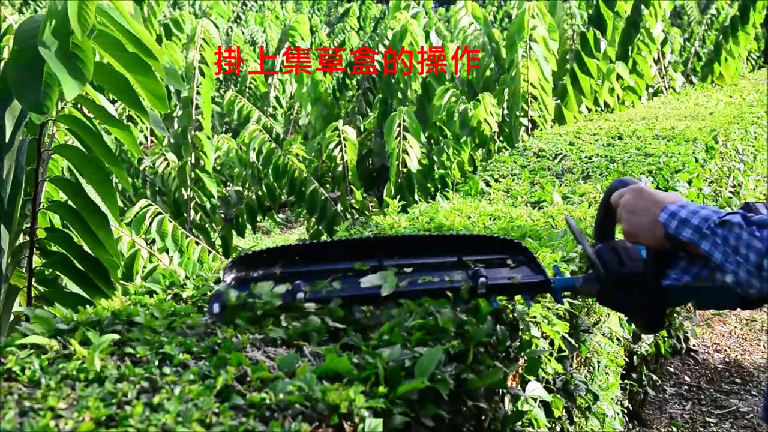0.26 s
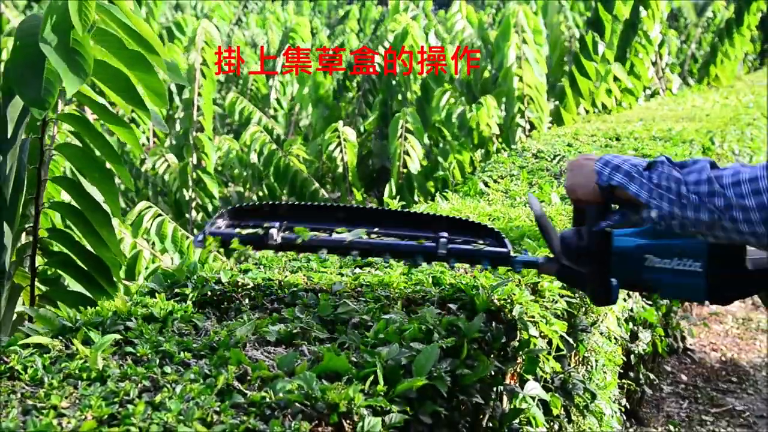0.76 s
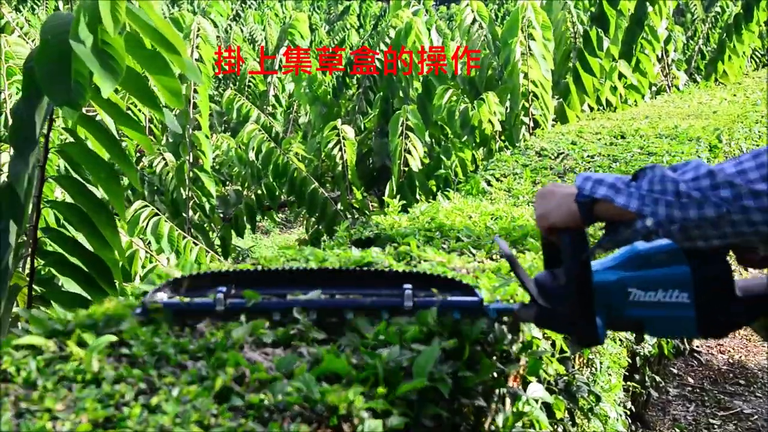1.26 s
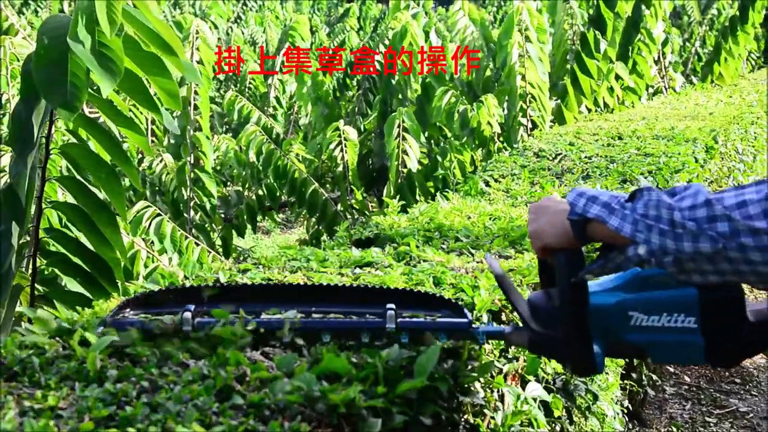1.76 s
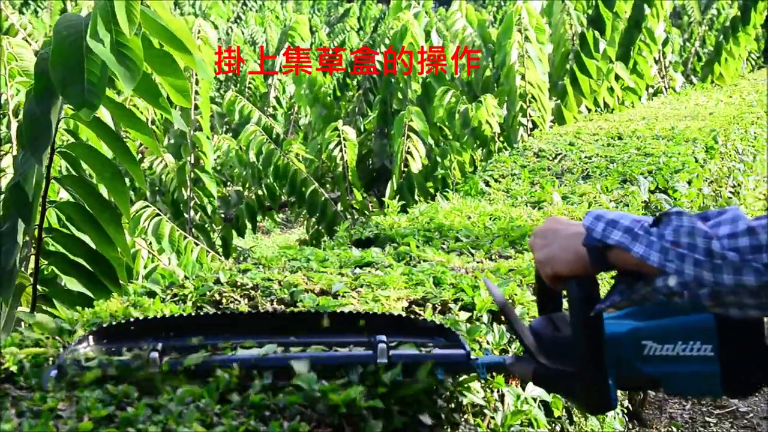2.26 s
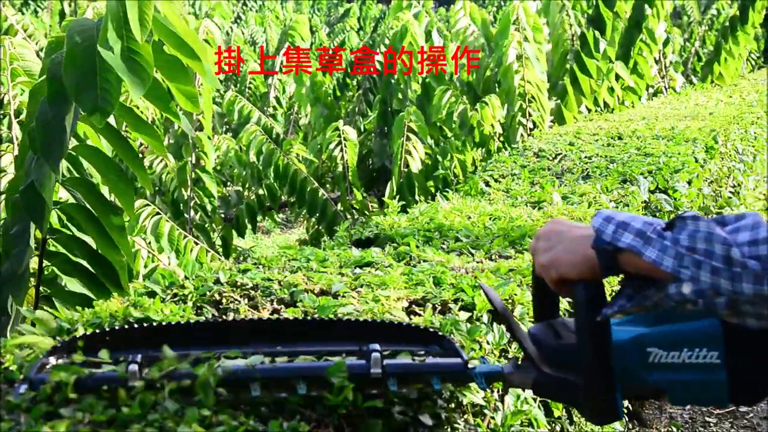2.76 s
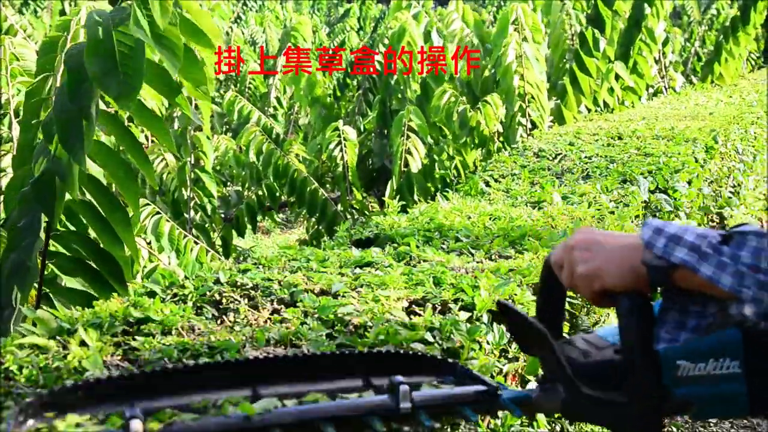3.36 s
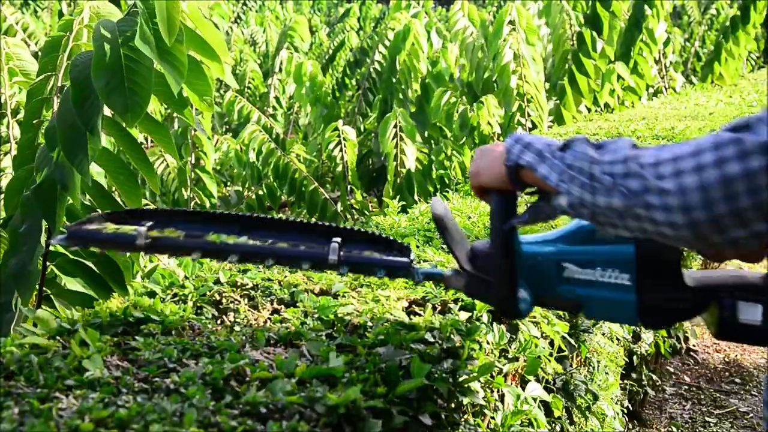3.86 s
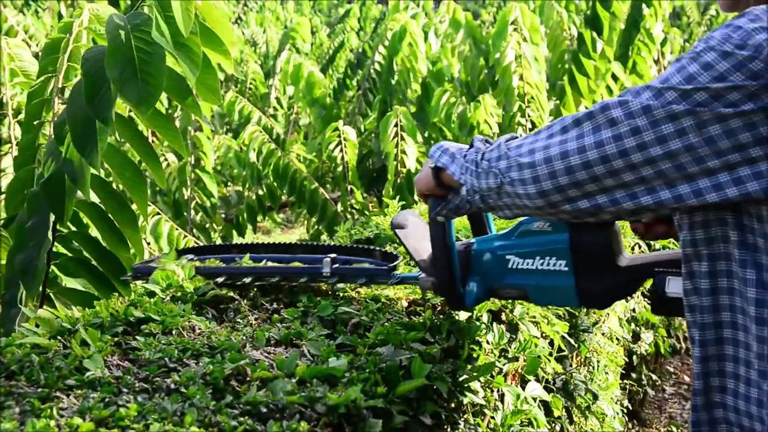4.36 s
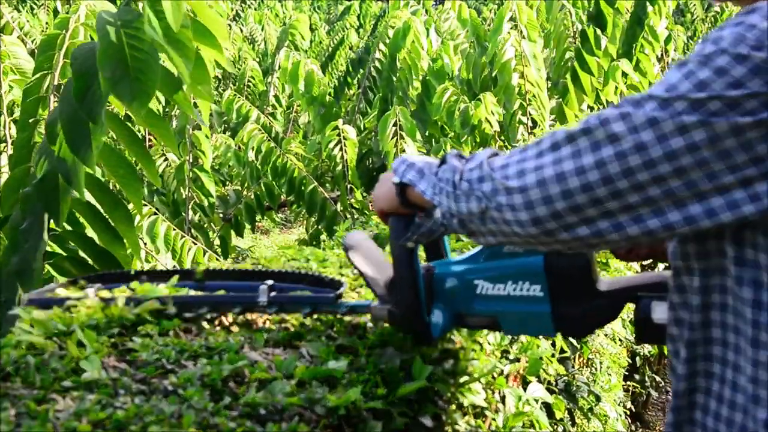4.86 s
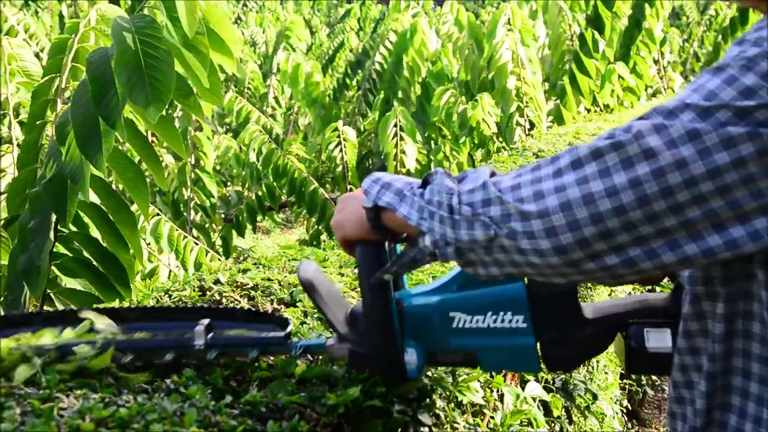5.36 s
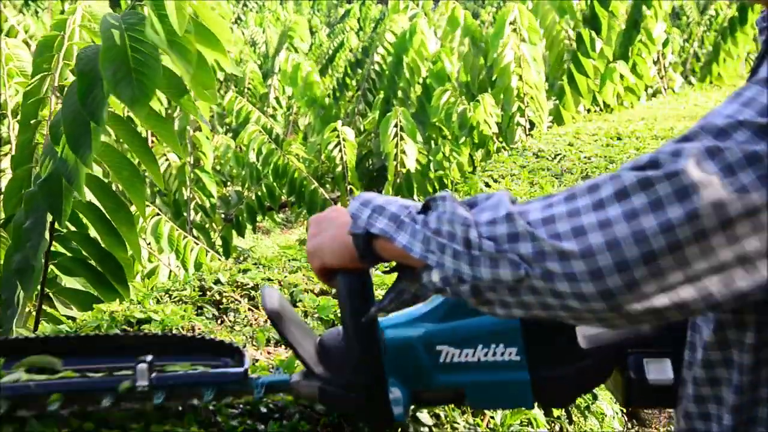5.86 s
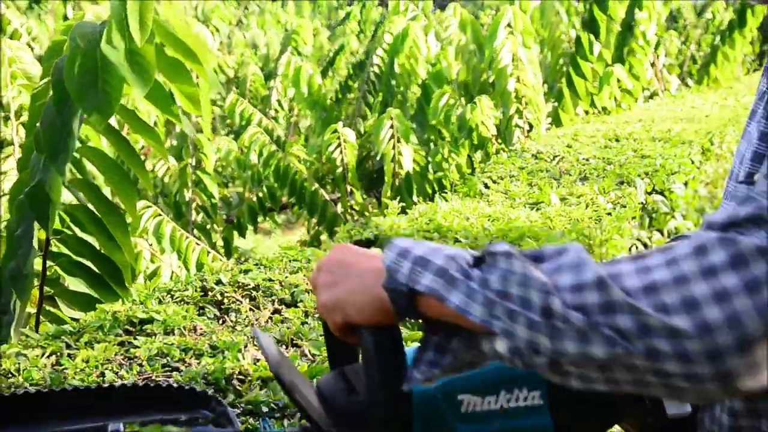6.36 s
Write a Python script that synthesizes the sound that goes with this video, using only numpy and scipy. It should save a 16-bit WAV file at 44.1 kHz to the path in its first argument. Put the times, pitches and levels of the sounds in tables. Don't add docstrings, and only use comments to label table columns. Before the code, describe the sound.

A running hedge trimmer is cut off in the first instant, leaving soft field hiss, a faint distant one-cylinder engine, leaf rustle and tiny bird chirps around 0.1-0.4 s. Plastic guard clicks with a springy rattle come at 0.5 s, a thin grip squeak near 0.65 s, louder lever clicks at 0.67 s and the trigger at 0.75 s. The motor surges up into a harsh, bright metallic clatter, about sixty strokes a second, with gear whine and scattered twig snaps; the whine and treble strengthen around 2.3-2.7 s. It coasts slightly and brakes abruptly at 3.28 s. Leaves rustle, a clipping snaps dully at 3.38 s and the far engine thumps. At 3.78 s the trimmer restarts, cutting until the end at 6.6 s, with a faint wind flutter near 4.7 s, hollow woody knocks around 5.6 and 6.05 s, and clustered loud snaps from 6.2 s.

```python
import sys
import numpy as np
from scipy import signal
from scipy.fft import rfft, irfft
from scipy.io import wavfile
from scipy.ndimage import uniform_filter1d

SR = 44100
rng = np.random.default_rng(int(sys.argv[2]) if len(sys.argv) > 2 else 0)


def persist_wave(psi):
    counts = np.round(np.clip(psi, -1, 1) * 32767).astype(np.int16)
    wavfile.write(sys.argv[1], SR, np.atleast_2d(counts).T)


def linear_from_db(decibels):
    return 10 ** (np.asarray(decibels, float) / 20)


N = 291501
TIME = np.arange(N) / SR

# pulled in seconds, blades braked in seconds, start-up surge in dB.
TRIGGER = [
    (-1, 0.002, 0),
    (0.7535, 3.282, 4),
    (3.78, 9, 4.5),
]
# time in seconds, level in dB,
# how far the blade points at the camera [0-1].
SWING = [(0, -17, 0.3), (1.1, -16.5, 0.16), (2.0, -17, 0.43), (2.7, -19, 0.76), (3.1, -17, .6),
         (4.0, -17, 0.24), (5.0, -17.5, 0.67), (5.9, -17.5, 0.97), (6.62, -18.5, 0.87)]


def level(x, db=0):
    return x * linear_from_db(db) / np.sqrt(np.mean(x ** 2))


def read(tables, column, off=-120.):
    curves = [np.array(table) for table in tables]
    return np.max([np.interp(TIME, c[:, 0], c[:, column], off, off) for c in curves], axis=0)


def colour(x, points):
    hz, db = np.transpose(points)
    bins = np.arange(1025) * SR / 2048
    cepstrum = irfft(np.interp(np.log(bins + 1), np.log(hz), db) * np.log(10) / 20)
    cepstrum[1:1024] *= 2
    cepstrum[1025:] = 0
    return signal.fftconvolve(x, irfft(np.exp(rfft(cepstrum))))[:N]


def ring(x, modes):
    return sum(linear_from_db(db) * signal.lfilter(*signal.iirpeak(hz, hz / width, SR), x) for hz, width, db in modes)


def butter(x, order, hz, kind="low"):
    return signal.sosfilt(signal.butter(order, hz, kind, fs=SR, output="sos"), x)


def walk(rate):
    hold = int(SR / rate)
    steps = np.repeat(rng.standard_normal(N // hold + 1), hold)
    return 0.83 * uniform_filter1d(steps, hold)[:N]


def grains(rate, spread_db, smear_s):
    hits = (rng.random(N) < rate / SR) * linear_from_db(2 * spread_db * rng.exponential(size=N).clip(0, 3))
    energy = signal.lfilter([1], [1, -np.exp(-2 / (smear_s * SR))], hits)
    return level(rng.standard_normal(N) * np.sqrt(energy + 1e-9))


def swells(rows):
    curves = []
    for peak_s, db, rise_s, fall_s in [row[:4] for row in rows]:
        rise, fall = (peak_s - TIME) / max(rise_s, .002), (TIME - peak_s) / max(fall_s, .002)
        curves.append(linear_from_db(db - 20 * np.maximum(rise, fall)))
    return np.array(curves)


def place(rows, shape):
    out = np.zeros(N + SR)
    for row in rows:
        y = shape(row)
        out[int(row[0] * SR):][:len(y)] += y
    return out[:N]


def stroke_rate():
    # time in seconds, strokes per second.
    first_cut = [(1.0, 55.35), (1.2, 57.35), (1.5, 59.08), (2.0, 58.94), (2.6, 59.25), (3.25, 58.45)]
    second_cut = [(4.0, 52.5), (4.05, 55.5), (4.1, 57), (4.3, 58.5), (4.6, 58.8), (5.0, 59.35), (5.5, 59.1),
                  (6.0, 59.25), (6.61, 58.9)]
    start_rate, catch_rate, coast_rate = 21, 41, 50
    catch_s = .11
    (_, (on1, off, _), (on2, _, _)) = TRIGGER
    points = []
    for on in (on1, on2):
        points += [(on, start_rate), (on + catch_s, catch_rate)]
    points += [(off + .01, coast_rate), (off + .05, start_rate)]
    return np.interp(TIME, *np.transpose(sorted(points + first_cut + second_cut)))


def strokes():
    # time in seconds, strokes done of the current pair [0-2].
    stroke_at = [
        (1.0, .45),
        (4.0, 1.64),
    ]
    done = np.cumsum(stroke_rate()) / SR
    (s1, p1), (s2, p2) = stroke_at
    return done + np.where(TIME < 3.5, p1 - done[int(s1 * SR)], p2 - done[int(s2 * SR)])


def stroke_number(done):
    return (done - done.min() // 2 * 2).astype(int)


def tool_gain():
    spin_up_s, surge_at_s, surge_wide_s = 0.087, .22, 0.11
    coast_s, coast_db_per_s, brake_db_per_s = 0.13, 34, 602
    gain = 0
    for on, off, surge_db in TRIGGER:
        since = np.maximum(TIME - on, 0)
        db = surge_db * np.exp(-((since - surge_at_s) / surge_wide_s) ** 2)
        db -= coast_db_per_s * np.clip(TIME - off + coast_s, 0, coast_s)
        db -= brake_db_per_s * np.maximum(TIME - off, 0)
        gain = gain + linear_from_db(db) * (1 - np.exp(-since / spin_up_s))
    return gain * linear_from_db(read([SWING], 1))


def clacks(done, scatter_db, slide):
    repeat_share = .18
    index, phase = stroke_number(done), done % 1
    rebound = 0.21 * np.exp(-((phase - .55) / 0.22) ** 2)
    shape = (1 - np.exp(-phase / 0.049)) * (np.exp(-phase / 0.26) + rebound)
    force = linear_from_db(scatter_db * rng.standard_normal(N // 400)[index] + 1.5 * (index % 2))
    worn = rng.standard_normal(1500)[(done % 2 * 749).astype(int)]
    noise = np.sqrt(1 - repeat_share) * rng.standard_normal(N) + np.sqrt(repeat_share) * worn
    return level(noise * (slide + force * shape))


def mesh(done, teeth, wobble):
    tones = 0
    for multiple, db in teeth:
        angle = 2 * np.pi * int(round(multiple)) * done + wobble * walk(120)
        tones = tones + linear_from_db(db + 1.7 * walk(25)) * np.sin(angle)
    return tones


def blades(done):
    # frequency in Hz, gain in dB per Hz.
    blade_colour = [(590, -31.5), (1000, -15.5), (1460, -5), (2110, -4.5), (2420, -2.5), (3330, -5),
                    (4050, 0), (5210, -4), (6480, -8.5), (8250, -12.5), (11000, -24), (15500, -32)]
    # frequency in Hz, width in Hz, level in dB.
    blade_rings = [(1375, 127, -1.5), (2470, 190, -2.5), (3440, 690, -0.5), (4710, 440, -3),
                   (6350, 460, -0.5)]
    # frequency in Hz, width in Hz, level in dB.
    steel = [(1620, 60, -6), (2950, 70, -4), (3560, 60, -2), (3950, 70, -2), (4330, 60, 0), (4620, 60, 0),
             (4870, 60, -1), (5130, 60, -2), (6450, 90, -5)]
    drive = clacks(done, 2.5, .5) + linear_from_db(-6) * grains(500, 3.5, .0012) * linear_from_db(2 * walk(14))
    rings = sum(ring(clacks(done, 3.5, .3), [mode]) * linear_from_db(3 + 1.5 * walk(3)) for mode in blade_rings)
    blade = level(colour(drive * linear_from_db(1.0 * walk(20)) + rings, blade_colour))
    bars = sum(ring(drive, [mode]) * linear_from_db(3.5 * walk(6)) for mode in steel)
    return level(blade + level(bars, -10))


def motor_housing(done):
    # frequency in Hz, width in Hz, level in dB.
    shell = [(433, 145, -0.5), (566, 82, -0.5), (805, 940, 7.5)]
    # multiple of the stroke rate, level in dB.
    crank = [(5, -10.5), (6, -8.5), (7, -3.5), (9, -2), (10, -7), (11, -4)]
    shaken = level(ring(ring(clacks(done, 2.7, 0.57), shell), [(614, 920, 0)]))
    return shaken + linear_from_db(-12) * mesh(done, crank, .3)


def cut_stems(done):
    # peak in seconds, level in dB against the tool,
    # seconds to rise 20 dB, seconds to fall 20 dB.
    patches = [
        (1.15, -12, 1.5, 2.5),
        (2.45, -10, 1.5, 3),
        (5.3, -14, 2, 1),
        (5.6, -6.5, 0.4, 0.4),
        (6.05, -6.5, 0.5, 0.2),
        (6.4, -8.5, 0.8, 3),
    ]
    index = stroke_number(done)
    chop = (index % 2) * linear_from_db(2.6 * rng.standard_normal(N // 400)[index]) * np.exp(-(done % 1) / 0.22)
    wood = ring(ring(chop * rng.standard_normal(N), [(2400, 450, 0)]), [(2350, 1200, 0)])
    return swells(patches).max(axis=0) * level(wood)


def gear_whine(done, facing):
    # multiple of the stroke rate, level in dB.
    low_mesh = [(31, -5), (33, 0), (34, -3), (41, -9)]
    # multiple of the stroke rate, level in dB.
    high_mesh = [(68.44, 4), (54, -6.5)]
    # multiple of the stroke rate, level in dB with the blade turned away.
    fan_mesh = [(110, -26)]
    # time in seconds, low mesh in dB, high mesh in dB, against the tool.
    gears = [(.9, -24, -26), (1.1, -16.5, -15), (1.9, -18, -13.5), (2.3, -16.5, -6.5), (3.25, -17, -10),
             (3.9, -14, -18), (4.02, -11.5, -8), (5.2, -12.5, -16), (5.4, -23, -23), (5.9, -17, -21),
             (6.3, -19, -8), (6.62, -18, -16)]
    seconds, low_points, high_points = np.transpose(gears)
    low_gain = linear_from_db(np.interp(TIME, seconds, low_points))
    high_gain = linear_from_db(np.interp(TIME, seconds, high_points))
    fan = linear_from_db(11.5 * facing) * mesh(done, fan_mesh, 1.4)
    return fan + low_gain * mesh(done, low_mesh, .2) + high_gain * mesh(done, high_mesh, .95)


def trimmer():
    done, facing = strokes(), read([SWING], 2)
    slow = 1 - stroke_rate() / 59
    blade = blades(done)
    low = butter(blade, 4, 7700)
    treble = level(butter(blade, 4, 7700, "high"))
    treble_db = -18.5 + 9 * facing - 17 * slow
    housing_db = -19.5 + 3 * facing + 3 * slow
    body = low + linear_from_db(treble_db) * treble + linear_from_db(housing_db) * motor_housing(done)
    return tool_gain() * (body + cut_stems(done) + gear_whine(done, facing))


def twigs():
    # time in seconds, peak in dB, pitch in Hz.
    twig_cuts = [(0.8372, -4, 3580), (0.8836, 1, 4770), (0.929, -1, 2800), (1.2458, -4, 4130),
                 (1.345, 0, 4460), (1.9552, -4, 4190), (2.059, -5, 4010), (2.2061, 3, 4560),
                 (2.3423, -1, 4030), (2.4103, 2, 3990), (2.7679, -8, 2470), (3.821, -4, 2840),
                 (3.8564, -2, 2950), (3.8888, -6, 4700), (3.9407, -3, 4830), (4.5433, -3.5, 3940),
                 (5.3215, -5, 4000), (5.4907, -5, 4760), (5.56, -2, 5460), (5.6927, -5, 2220),
                 (5.8625, -1, 4150), (6.0649, -4, 3970), (6.234, -5, 4480), (6.29, -2, 4020),
                 (6.3216, -3, 4350), (6.3553, 1, 3970), (6.3866, 1.5, 3900), (6.438, 3, 4050),
                 (6.4719, -10, 3990)]
    # time in seconds, peak in dB, pitch in Hz.
    clippings = [
        (0.1456, -31, 4250),
        (0.2174, -20, 3000),
        (0.2484, -21, 1430),
        (3.3371, -22.5, 4890),
        (3.374, -14, 1890),
        (3.6084, -29, 5220),
        (3.6588, -26, 1800),
        (3.6788, -24, 3000),
        (3.7401, -30, 1670),
        (3.7845, -21, 3130),
    ]
    t = TIME[:1500]

    def snap(row):
        burst = ring(rng.standard_normal(len(t)) * np.exp(-t / .003), [(row[2], 4000, 0)])
        burst = butter(burst, 2, 7000)
        return linear_from_db(row[1] - 3) * burst / np.abs(burst).max()
    return place(twig_cuts + clippings, snap)


def ticks():
    # time in seconds, peak in dB, ring in seconds.
    clicks = [
        (0.4847, -6.5, 0.41),
        (0.4912, -8, 0.22),
        (0.4939, -7, 0.39),
        (0.6683, -6, 0.06),
        (0.6743, -3.5, 0.045),
        (0.6782, -3.5, 0.051),
        (0.7487, -4.5, 0.39),
        (0.7703, -12, 0.2),
        (0.7746, -15, 0.24),
    ]
    # frequency in Hz, level in dB.
    lever = [(2690, -25), (3310, -16), (4310, -9), (4650, 20), (4985, 11), (7300, -20), (8800, -9)]
    # frequency in Hz, width in Hz, level in dB.
    spring = [(2600, 70, -5), (3350, 70, -8), (4350, 70, -4), (4600, 70, 0), (4850, 70, 0), (5120, 70, -2),
              (6200, 80, -15)]
    t = TIME[:12000]

    def tick(row):
        modes = 0
        for hz, db in lever:
            detune = 1 + .015 * rng.standard_normal()
            modes = modes + linear_from_db(db) * np.sin(2 * np.pi * hz * detune * t)
        crack = ring(rng.standard_normal(len(t)) * np.exp(-t / 0.0009), [(6000, 6000, 0)])
        body = modes * np.exp(-t / 0.003) + 0.26 * crack
        rattle = level(ring(ring(rng.standard_normal(len(t)), spring), [(4000, 2000, 0)]), -15)
        rattle = rattle * np.exp(-6.9 * t / max(row[2], .01))
        return linear_from_db(row[1] - 2.5) * (body / np.abs(body).max() + rattle)
    return butter(place(clicks, tick), 3, (2000, 9500), "band")


def rustle():
    # peak in seconds, peak in dB, seconds to rise 20 dB,
    # seconds to fall 20 dB, bright share [0-1].
    brushes = [(.15, -38.5, .7, .4, .75), (.219, -33, .006, 0.1, 0.4), (.254, -29.5, .06, 0.1, 0.44),
               (.3, -32.5, 0.1, .16, .92), (.5, -30.5, 0.05, .3, .35), (.655, -34, 0.25, 0.2, 0.8),
               (.677, -27.5, 0, .09, 0.76), (3.3, -31.5, .01, .16, .8), (3.377, -20.5, 0, 0.02, .2),
               (3.55, -42.5, -0.5, 1.5, .7), (3.681, -23.5, .06, 0.07, 0.17), (3.74, -35.5, .04, 0.3, .45),
               (3.79, -22.5, .006, .14, .7)]
    bright, force = np.clip(np.array(brushes)[:, 4], 0, 1), swells(brushes) ** 2
    dull = level(ring(ring(grains(700, 1.6, .003), [(1070, 2700, 0)]), [(900, 2800, 0)]))
    crisp = ring(ring(grains(860, 3.5, 0.0022), [(4400, 3200, 0)]), [(4400, 2800, 0)])
    crisp = level(ring(crisp, [(3500, 2100, 0)]))
    return linear_from_db(-4) * (np.sqrt((1 - bright) @ force) * dull + np.sqrt(bright @ force) * crisp)


def chirps():
    # start in seconds, end in seconds, start in Hz, end in Hz, level in dB.
    calls = [(.108, .13, 4100, 4400, -41), (.13, .2, 4500, 5400, -52), (.278, .294, 3000, 3000, -43),
             (.29, .306, 4800, 4160, -29), (.31, .33, 4200, 5300, -35), (.31, .372, 2300, 3200, -45),
             (.612, .634, 3050, 3040, -30), (.632, .682, 2750, 2700, -34), (.644, .654, 3500, 3800, -25),
             (.655, .706, 3300, 3340, -27.5), (.714, .75, 3400, 3350, -39)]

    def note(row):
        start_s, end_s, start_hz, end_hz, db = row
        n = int((end_s - start_s) * SR)
        hz = np.linspace(start_hz, end_hz, n) * (1 + .025 * walk(500)[:n])
        gain = linear_from_db(db + 3.5 * walk(260)[:n]) * np.hanning(n) ** 0.1
        return gain * np.sin(2 * np.pi * np.cumsum(hz) / SR)
    return place(calls, note)


def engine():
    # time in seconds, level in dB.
    loudness = [(0, -53), (.2, -40), (.45, -46), (.9, -39.5), (1.5, -43.5), (2.5, -43), (2.8, -51),
                (3.25, -50.5), (3.4, -35.5), (4.0, -34.5), (4.3, -38.5), (5.0, -41), (5.8, -45),
                (6.62, -45)]
    # time in seconds, firings per second.
    firing_rate = [(0, 5.724), (.9, 6.244), (1.9, 8.915), (2.3, 10.912), (3.0, 9.258), (3.7, 10.718),
                   (4.8, 13.774), (6.61, 13.725)]
    # frequency in Hz, width in Hz, level in dB.
    silencer = [(58, 11, 5.5), (74.2, 6.7, 11.5), (96, 12, 2.5), (115, 20, -1.5), (185, 54, -7.5)]
    first_firing, lag_s = .846, .018
    rate = read([firing_rate], 1)
    done = first_firing + np.cumsum(rate) / SR - lag_s * rate
    puff_db = -4.5 + np.minimum(3.4 * (rate - 10.6), 2.5 * (10.6 - rate))
    size = linear_from_db(1.0 * rng.standard_normal(100))[done.astype(int)]
    push = np.diff(done // 1, prepend=0) + 0.46 * np.diff((done + 0.409) // 1, prepend=1)
    push = uniform_filter1d(uniform_filter1d(size * push, 130), 130)
    thump = level(ring(push, silencer)) + level(ring(rng.standard_normal(N), silencer), -13)
    thump = level(butter(thump, 3, 44, "high"))
    puff = size * (0.36 + np.exp(-(done % 1) / 0.13)) * rng.standard_normal(N)
    puff = level(ring(ring(puff, [(313, 570, 8), (890, 380, -3)]), [(600, 1300, 0)]))
    return linear_from_db(read([loudness], 1)) * (thump + linear_from_db(puff_db) * puff)


def wind_gust():
    # peak in seconds, level in dB, seconds to rise 20 dB, seconds to fall 20 dB.
    gusts = [
        (4.66, -32.5, .05, 0.1),
        (4.8, -37, 0.2, 0.14),
    ]
    flutter = level(ring(ring(rng.standard_normal(N), [(140, 79, 0)]), [(140, 140, 0)]))
    return swells(gusts).max(axis=0) * linear_from_db(3.6 * walk(25)) * flutter


def field_hiss():
    # frequency in Hz, gain in dB per Hz.
    field_colour = [(88, -26), (150, -0.5), (268, -6), (985, -8), (1400, -8.5), (2700, -17.5),
                    (4480, -12.5), (10700, -26), (15500, -37)]
    hiss = level(colour(rng.standard_normal(N), field_colour), -42.5 - 4.5)
    return hiss * linear_from_db(1.0 * walk(5))


def scene():
    small = ticks() + chirps()
    t = TIME[:6000]
    foliage = level(rng.standard_normal(len(t)) * np.exp(-t / .02), -13) / np.sqrt(len(t))
    echo = signal.fftconvolve(small, foliage)[:N]
    near = trimmer() + twigs() + small + echo + rustle()
    return (near + engine() + field_hiss() + wind_gust())[None]


def thin_frames(x):
    # start in seconds, dB a line must stand over its neighbours, top in Hz.
    thinned = [
        (0.014, 1.5, 7200),
        (.628, -6, 5300),
        (2.103, -3, 8800),
        (3.297, 2.5, 7000),
        (3.379, 1, 5300),
        (3.446, -1.5, 5300),
        (3.977, 0.5, 7000),
    ]
    x, window = np.pad(x, 1024), np.hanning(1600)
    hz = np.arange(801) * SR / 1600
    for s, over_db, top_hz in thinned:
        start = int(s * SR) + 224
        frame = slice(start, start + 1600)
        lines = rfft(x[frame] * window)
        strength = uniform_filter1d(np.abs(lines), size=4)
        weak = strength < linear_from_db(over_db) * uniform_filter1d(strength, size=30)
        lost = weak & (hz > 250) | (hz > top_hz)
        x[frame] -= irfft(lines * lost)
    return x[1024:-1024]


def top_cut(x):
    return signal.sosfilt(signal.butter(12, 16620, fs=SR, output="sos"), x)


def record(dry):
    soft = dry[0] / (1 + (dry[0] / .86) ** 4) ** .25
    x = signal.sosfilt(signal.ellip(8, .2, 70, 15800, fs=SR, output="sos"), soft)
    return top_cut(thin_frames(x)[None])


dry = scene()
out = record(dry)
persist_wave(out)
```